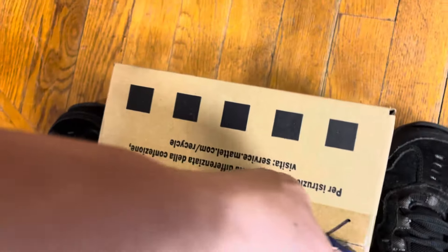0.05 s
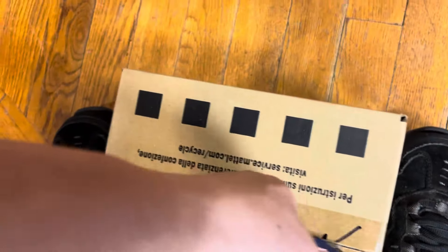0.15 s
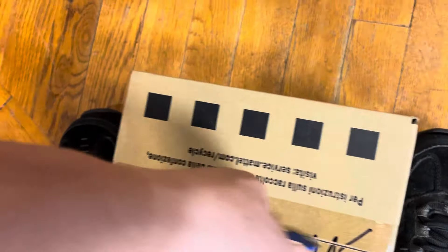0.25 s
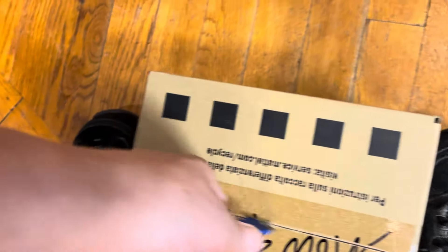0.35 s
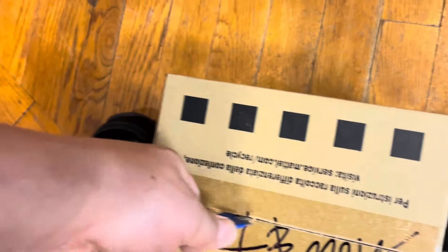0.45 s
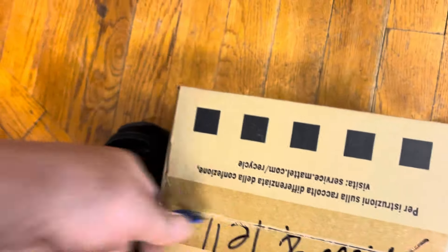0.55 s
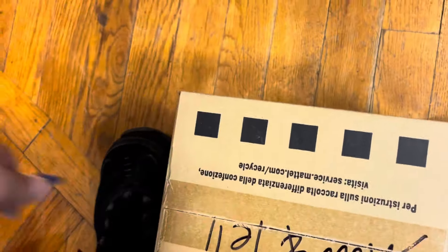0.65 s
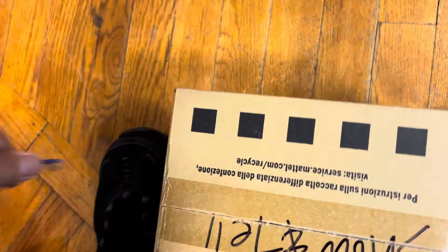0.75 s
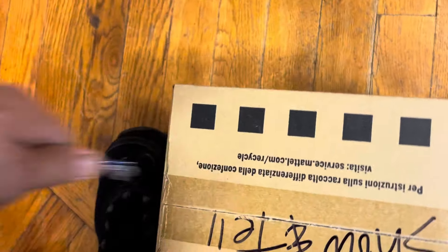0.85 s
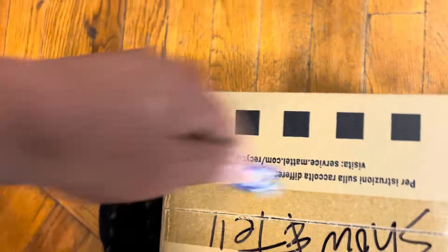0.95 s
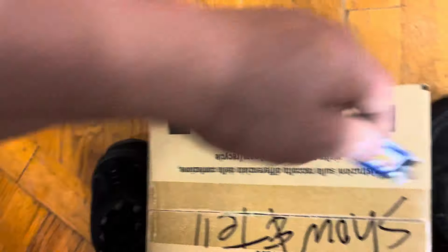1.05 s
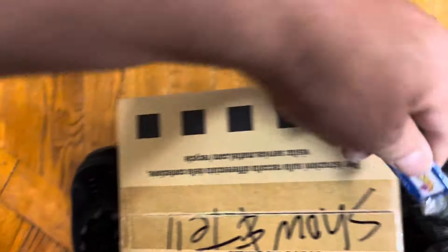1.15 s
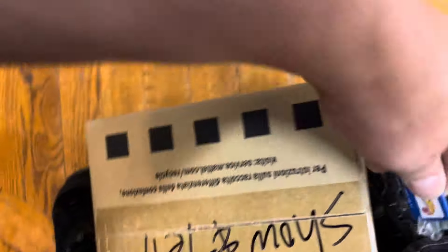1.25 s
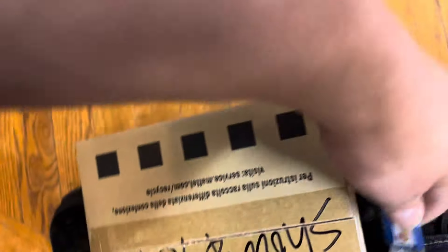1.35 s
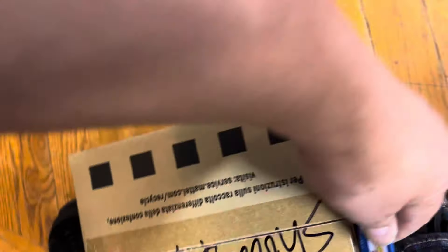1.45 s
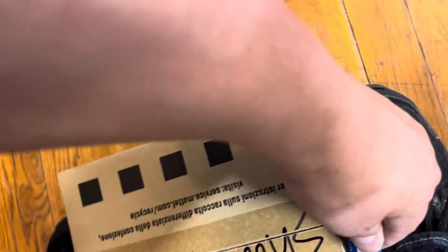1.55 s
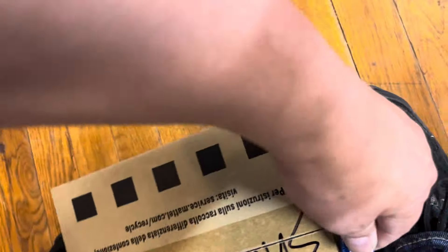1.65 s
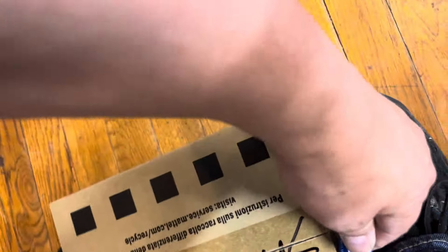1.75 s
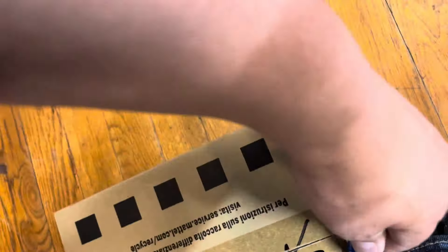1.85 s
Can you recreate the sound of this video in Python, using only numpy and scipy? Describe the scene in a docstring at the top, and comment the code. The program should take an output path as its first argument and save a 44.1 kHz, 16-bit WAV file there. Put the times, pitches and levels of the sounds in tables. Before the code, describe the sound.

Close handheld stereo pickup of a box cutter scraping a taped carton, with boxy bumps and a final loud thump, then near quiet, faint skin rubbing, soft cardboard taps and crackly ticks over low room tone.

```python
"""Blade along a taped carton

A blade drawn along the tape of a cardboard carton slips, catches and jumps free with a thump.
The hand then moves round the carton, knocking it lightly while the tape ticks and skin rubs the card.
Clumped clicks and single knocks ring the carton's modes; filtered clicks and noise bursts make the tape.
A hand-held pair of microphone ports hears it from close above, in a quiet room with a faint tone."""
import sys
import numpy as np
from scipy import signal
from scipy.fft import rfft, irfft, next_fast_len
from scipy.io import wavfile
from scipy.ndimage import uniform_filter1d

SR = 44100
rng = np.random.default_rng(int(sys.argv[2]) if len(sys.argv) > 2 else 0)


def file_out(sig):
    """Save sig as 16-bit WAV at sys.argv[1]."""
    # one column per channel
    cols = np.atleast_2d(sig).T
    # limit, then scale
    lim = np.clip(cols, -1, 1)
    pcm = np.round(lim * 32767).astype(np.int16)
    wavfile.write(sys.argv[1], SR, pcm)


N = 83790  # length [samples]

# Colour of rubbed tape: (frequency [Hz], relative density [dB per Hz])
TAPE_COLOUR = [(1850, 1), (2500, 3), (4800, -3.5), (6500, -3.5), (8000, -9.5), (10500, -1.5), (14000, -9.5),
               (16000, -10.5)]


def gain_of(db):
    """Amplitude gain of a level in dB."""
    return 10 ** (np.asarray(db) / 20)


def evened(x):
    """Scales x to an RMS of one."""
    return x / np.sqrt(np.mean(x ** 2) + 1e-20)


def read(points, hz):
    """Reads a curve of (frequency, value) along a log frequency axis."""
    f, value = np.transpose(points)
    return np.interp(np.log(hz + 1), np.log(f + 1), value)


def level(table, column=1):
    """Gain over time along one dB column of a table whose first column is time."""
    rows = np.array(table)
    return gain_of(np.interp(np.arange(N) / SR, rows[:, 0], rows[:, column]))


def add(mix, s, sound):
    """Adds a sound to the mix from time s, cut at the end of the mix."""
    part = mix[round(s * SR):][:len(sound)]
    part += sound[:len(part)]


def coloured(x, points):
    """Filters x by a spectrum in dB."""
    hz = np.fft.rfftfreq(N, 1 / SR)
    return irfft(rfft(x) * gain_of(read(points, hz)), N)


def peaked(x, hz, width_hz):
    """A broad resonance applied twice, then evened."""
    b, a = signal.iirpeak(hz, hz / width_hz, SR)
    once = signal.lfilter(b, a, x)
    return evened(signal.lfilter(b, a, once))


def slips(per_s):
    """Random clicks of either sign and uneven size, whose loudness swells in clumps."""
    spread_db, clump_db = 2.5, 2.4
    drift = uniform_filter1d(rng.standard_normal(N), size=200)
    clump = evened(uniform_filter1d(drift, size=200))
    unevenness = np.minimum(rng.exponential(1, N), 4)
    size = gain_of(spread_db * unevenness + clump_db * clump)
    sign = rng.choice([-1., 1.], N)
    happens = rng.random(N) < per_s / SR
    return size * sign * happens


def ring(centre_hz, octaves, damping=1):
    """The carton's decaying modes, weighted round the pitch the contact favours; low modes arrive later."""
    # Modes of the carton: (frequency [Hz], relative level [dB], t60 at damping 1 [s])
    carton = [(93.8, 2.5, 0.08), (138.4, 2.5, 0.086), (190.4, 1, 0.069), (264, 4, 0.053),
              (302.2, -1.5, 0.073), (340.8, -6, 0.1), (538, -3, 0.08), (722, 0, 0.027), (965, 2.5, 0.018),
              (1108, 0.5, 0.031), (1455, 6, 0.013), (2540, 4, 0.055)]
    rise_cycles, lag_cycles = 0.46, 0.69  # each mode's onset, in its own cycles
    hz, db, t60 = np.transpose(carton)[:, :, None]
    t = np.maximum(np.arange(6000) / SR - lag_cycles / hz, 0)
    favour = np.exp(-.5 * (np.log2(hz / centre_hz) / octaves) ** 2)
    onset = 1 - np.exp(-t * hz / rise_cycles)
    decay = gain_of(db - 60 * t / t60 / damping)
    return (favour * onset * decay * np.sin(2 * np.pi * hz * t)).sum(0)


def blade():
    """Slips of the edge ring the carton low and high, and hiss and squeak in the tape."""
    # The stroke: (time [s], carton boom [dB], card rasp [dB], tape hiss [dB], tape squeak [dB])
    stroke = [(0, -41.5, -39.5, -43, -62), (.12, -37.5, -44, -43, -63), (.2, -32, -37.5, -43, -57.5),
              (.28, -26.5, -27.5, -40, -50.5), (.297, -27, -47, -43.5, -74), (.36, -23.5, -36, -44, -53),
              (.4, -29.5, -55.5, -44.5, -65), (.43, -25.5, -46, -47.5, -71), (.465, -29, -32.5, -36.5, -64),
              (.5, -32, -26.5, -42.5, -44), (.52, -35.5, -29.5, -34.5, -37.5), (.555, -28.5, -25, -37, -42),
              (.576, -28, -24, -29, -54), (.6, -20, -40, -31, -73), (.61, -75, -77.5, -103, -101)]
    slips_per_s = 1400
    squeak_hz, squeak_width_hz = 3050, 1100
    edge = slips(slips_per_s)
    fine = slips(8 * slips_per_s) + 1.3 * edge
    hiss = level(stroke, column=3) * evened(coloured(fine, TAPE_COLOUR))
    squeak = level(stroke, column=4) * peaked(fine, squeak_hz, squeak_width_hz)
    out = hiss + squeak
    # Boom favoured by the hand, rasp by the edge, scratch by the squeak: (column, pitch [Hz], octaves)
    for k, hz, octaves in ((1, 197, 1.0), (2, 748, 0.66), (4, 1400, 0.13)):
        body = ring(hz, octaves)
        drive = level(stroke, column=k) * evened(edge)
        out += signal.oaconvolve(drive, body)[:N] / np.linalg.norm(body)
    return out


def knocks():
    """Each knock rings the carton, whose modes die sooner under the hand."""
    # Knocks: (time [s], peak level [dB], favoured pitch [Hz], spread [octaves])
    knock_list = [(0.3388, -14.5, 807, 0.19), (0.3385, -7, 283, 0.61), (0.4426, -15, 645, 0.36),
                  (0.485, -15, 540, 0.49), (0.592, -4, 432, 0.85), (0.593, -19.5, 111, 0.15),
                  (0.883, -41.5, 990, 0.53), (0.926, -26.5, 1120, 0.4), (1.4175, -37, 790, 0.26),
                  (1.4209, -21, 288.6, 0.075), (1.443, -41, 300, 0.54), (1.508, -31, 630, 0.45),
                  (1.533, -39.5, 476, 0.65), (1.572, -41.5, 980, 0.34), (1.5857, -15.5, 773, 0.29),
                  (1.5884, -19, 195, 0.88), (1.655, -37.5, 840, 0.49), (1.877, -33, 905, 0.27)]
    held = 0.62  # the hand on the carton shortens its ring to this share
    out = np.zeros(N)
    for s, db, hz, octaves in knock_list:
        sound = ring(hz, octaves, held)
        add(out, s, gain_of(db) * sound / abs(sound).max())
    return out


def ticks():
    """Short bursts of noise, part through a broad ring of the tape, part a wide crack."""
    # Ticks: (time [s], burst envelope peak [dB], rise [s], share of wide crack [0-1], ring pitch [Hz])
    tick_list = [(0.338, -15, 0.00089, 1, 4940), (0.4088, -38, 0.0013, 1, 4000),
                 (0.4868, -22.5, 0.00042, 0.73, 3700), (0.5906, -22.5, 0.00043, 0.7, 2400),
                 (0.9206, -39, 0.0022, 0.47, 3900), (1.318, -49.5, 0.001, 0.36, 4000),
                 (1.3583, -48, 0.00083, 0.64, 3760), (1.417, -44, 0.00096, 0.24, 3430),
                 (1.529, -46, 0.0014, 0.52, 4040), (1.5848, -39, 0.0019, 0.51, 3500),
                 (1.6515, -44.5, 0.0013, 0, 3640), (1.656, -40, 0.0011, 0.4, 3600),
                 (1.6755, -37.5, 0.00079, 0.46, 4280), (1.864, -45.5, 0.0014, 0.85, 4160),
                 (1.8748, -20.5, 0.00046, 0.55, 3910)]
    ring_width_hz, crack_band_hz = 1800, [2460, 13500]
    out, t = np.zeros(N), np.arange(1500) / SR
    crack_filter = signal.butter(1, crack_band_hz, "band", fs=SR)
    noises = rng.standard_normal((len(tick_list), 1500))
    for (s, db, rise, share, hz), noise in zip(tick_list, noises):
        burst = noise * t / rise * np.exp(1 - t / rise)
        share = np.clip(share, 0, 1)
        crack = evened(signal.lfilter(*crack_filter, burst))
        sound = (1 - share) * peaked(burst, hz, ring_width_hz) + share * crack
        # The filtered sound keeps the RMS of its burst
        add(out, s, gain_of(db) * evened(sound) * np.sqrt(np.mean(burst ** 2)))
    return out


def skin_rustle():
    """Faint rubbing of skin on card: dense clumped clicks, coloured like the rubbed tape."""
    # Rubbing: (time [s], level [dB])
    rubbing = [(.76, -69), (.8, -78.5), (.9, -64), (.95, -63), (1, -79), (1.55, -67), (1.62, -62),
               (1.86, -76.5), (1.885, -50.5)]
    return level(rubbing) * evened(coloured(slips(6700), TAPE_COLOUR))


def room(x):
    """Sparse taps of random sign, each band dying at its own speed; the bass is alike at both ports."""
    # Decay of the room, before the early lift: (frequency [Hz], t60 [s])
    room_decay = [(250, 0.42), (1200, 0.29), (12000, 0.24)]
    mono_hz = 250  # well below this the ports hear the same reflections
    early_db, early_s = 8, 0.012  # nearby surfaces add strength to the first reflections
    taps = np.zeros((2, SR // 2))
    jitter = rng.integers(0, 20, (2, (SR // 2 - 41) // 20))
    at = np.arange(40, SR // 2 - 20, 20) + jitter
    np.put_along_axis(taps, at, rng.choice([-1., 1.], at.shape), 1)
    hz, t, z = signal.stft(taps, SR, nperseg=512)
    apart = (1 / (1 + (mono_hz / (hz + 1)) ** 2))[:, None]
    z[1] = apart * z[1] + np.sqrt(1 - apart ** 2) * z[0]
    decay = gain_of(-60 * t / read(room_decay, hz)[:, None])
    tail = signal.istft(z * decay, SR, nperseg=512)[1]
    early = np.exp(-np.arange(tail.shape[1]) / SR / early_s)
    tail = tail * (1 + gain_of(early_db) * early)
    return signal.fftconvolve(x[None], tail / np.linalg.norm(tail[0]), axes=1)[:, :N]


def room_tone():
    """Low rumble and a faint airy band: shaped noise in drifting patches, partly alike at both ports."""
    # Colour of the tone: (frequency [Hz], relative density [dB per Hz])
    tone_colour = [(30, -12), (62, 14.5), (120, -9.5), (345, -14.5), (486, -33.5), (1100, -32.5),
                   (1600, -22), (2600, -43), (6000, -46), (16000, -77)]
    # Left-right likeness: (frequency [Hz], correlation [0-1])
    likeness = [(150, 0.96), (1500, 0.21), (5000, 0.49)]
    tone_db, patch_db = -46.5, 1.2  # RMS level, RMS depth of the patches
    frames, hz = N // 256 + 5, np.fft.rfftfreq(1024, 1 / SR)
    a, b, c, d, patches = rng.standard_normal((frames, 513, 5)).T
    patches = uniform_filter1d(patches, size=8, axis=0)  # across frequency
    patches = evened(uniform_filter1d(patches, size=10, axis=1))  # across time
    same = np.clip(read(likeness, hz), -1, 1)[:, None]
    left, other = a + 1j * b, c + 1j * d
    z = np.array([left, same * left + np.sqrt(1 - same ** 2) * other])
    z *= gain_of(read(tone_colour, hz)[:, None] + patch_db * patches)
    tone = signal.istft(z, nperseg=1024, noverlap=768)[1][:, :N]
    return gain_of(tone_db) * evened(tone)


def scene():
    """The close sounds reach both ports alike, with their room reflections and the room tone."""
    room_db = -11.5
    near = blade() + knocks() + ticks() + skin_rustle()
    return near + gain_of(room_db) * room(near) + room_tone()


def record(dry):
    """The ports differ in phase and level by frequency; then a bass cut and a band limit."""
    # Phase between the ports: (frequency [Hz], left lead [rad])
    lead = [(600, 0), (2000, .8), (4800, .3), (6900, -1.7), (8300, -3.2), (11000, -5.9), (13000, -6.5),
            (14800, -9.3)]
    # Balance of the ports: (frequency [Hz], left minus right [dB])
    tilt = [(400, 0), (750, -5), (1300, -3), (2300, 2.5), (5000, 0)]
    bass_cut_hz, edge_hz = 48, 15900
    size = next_fast_len(N + 2048)
    hz = np.fft.rfftfreq(size, 1 / SR)
    # Half of each difference goes to the left port, the opposite half to the right
    left = gain_of(.5 * read(tilt, hz)) * np.exp(.5j * read(lead, hz))
    pair = irfft(rfft(dry, size) * np.array([left, 1 / left]), size)[:, :N]
    pair = signal.lfilter(*signal.butter(3, bass_cut_hz, "high", fs=SR), pair)
    band_limit = signal.firwin(511, edge_hz, window=("kaiser", 9), fs=SR)
    return signal.oaconvolve(pair, band_limit[None], "same")


dry = scene()
out = record(dry)
file_out(out)
```